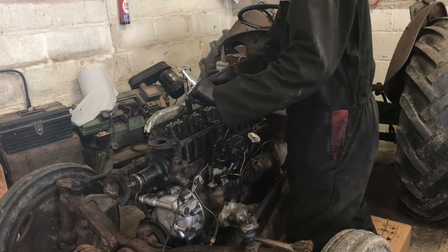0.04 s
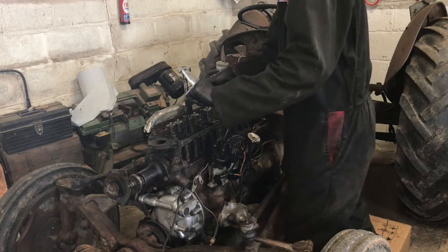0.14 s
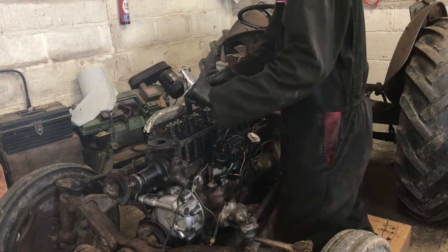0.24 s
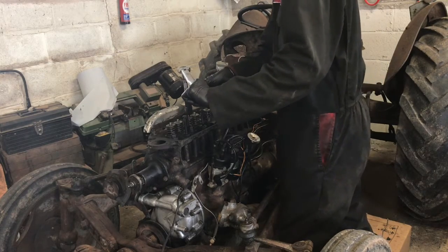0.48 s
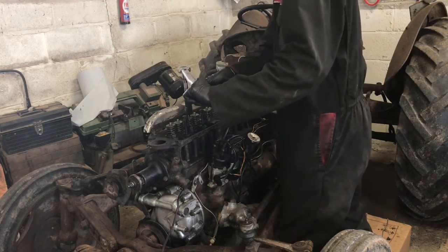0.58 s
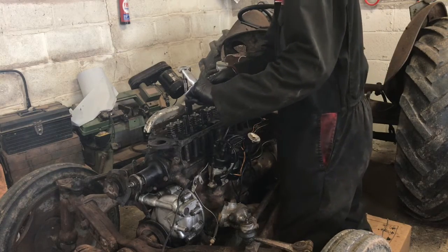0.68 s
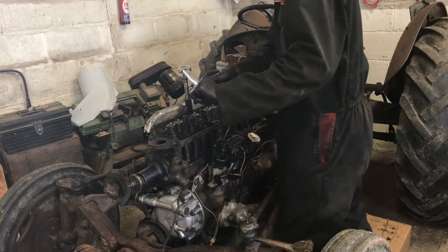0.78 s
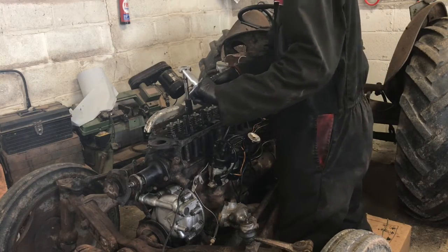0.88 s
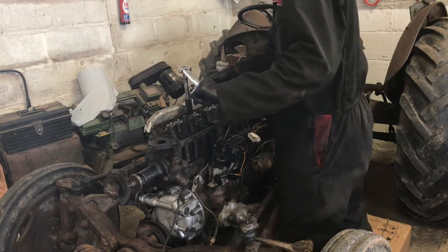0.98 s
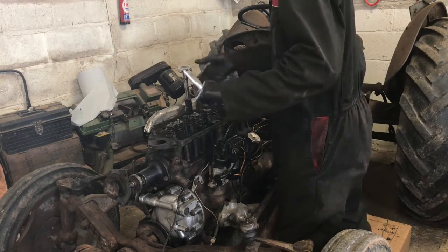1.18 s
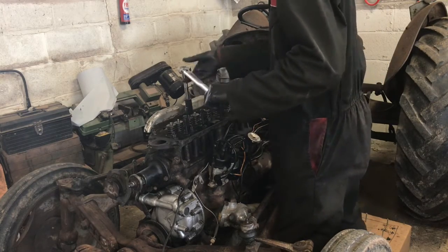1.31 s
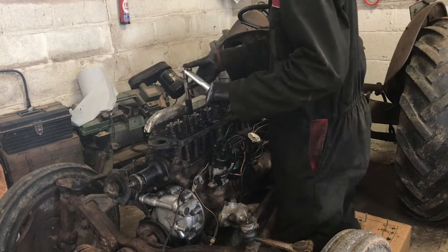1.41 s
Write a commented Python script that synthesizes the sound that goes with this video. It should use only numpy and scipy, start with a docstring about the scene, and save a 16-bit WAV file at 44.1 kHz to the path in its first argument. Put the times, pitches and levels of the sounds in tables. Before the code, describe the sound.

Two loud metallic torque wrench clicks ring through a bare workshop, followed by faint sleeve rustle

```python
"""Torque wrench in a hard-walled workshop

A click-type wrench on an engine creaks under load, breaks over with a bright click, and snaps back
with a duller one as the hand eases off; a sleeve then rustles and the tool is shifted.
Clicks are decaying noise and struck modes, over low-ringing steel and a diffuse room decay.
Rubbing and room air are shaped noise; knocks are noise through a resonance."""
import sys
import numpy as np
from scipy import signal
from scipy.fft import rfft, irfft
from scipy.io import wavfile

SR = 44100
rng = np.random.default_rng(int(sys.argv[2]) if len(sys.argv) > 2 else 0)


def store_pcm(level_fs):
    """Save levels as 16-bit WAV."""
    pcm = np.round(np.clip(level_fs, -1, 1) * 32767).astype(np.int16)
    wavfile.write(sys.argv[1], SR, np.atleast_2d(pcm).T)


N = 63945
TIME = np.arange(N) / SR  # s
FREQS = np.arange(N // 2 + 1) * SR / N  # Hz


def from_db(db):
    """Logarithmic level: 20 dB is a factor of ten in amplitude."""
    return 10 ** (np.asarray(db) / 20)


def at_hz(points, values):
    """Logarithmic pitch scale: values are joined by straight lines over log frequency."""
    log_hz = np.log(np.array(points)[:, 0])
    return np.interp(np.log(FREQS + 1), log_hz, values)


def noise(spectrum, column=0):
    """Spectral density: white noise is filtered to a given level in each hertz of bandwidth."""
    density_db = np.array(spectrum)[:, column + 1]
    gain = from_db(at_hz(spectrum, density_db))
    white = rng.standard_normal(N)
    return irfft(rfft(white) * gain, N) * np.sqrt(SR / 2)


def level(curve):
    """Amplitude envelope: dB points are joined by lines, the end levels held outside them."""
    return from_db(np.interp(TIME, *np.transpose(curve)))


def decay(start, t60, hold=0):
    """Exponential decay: sudden onset, optional hold, then a fall of 60 dB in each t60."""
    elapsed = np.maximum(TIME - start - hold, 0)
    return (TIME >= start) * np.exp(-np.log(1000) * elapsed / t60)


def ring(start, hz, t60):
    """Free vibration: one struck mode is a decaying sine."""
    return decay(start, t60) * np.sin(2 * np.pi * hz * (TIME - start))


BUILD_CYCLES = 2.5  # time constant in cycles, so the bass comes late


def build(start, hz):
    """Resonant build-up: a resonance swells over its first few cycles."""
    elapsed = np.maximum(TIME - start, 0)
    return 1 - np.exp(-elapsed * hz / BUILD_CYCLES)


# quiet of the workshop: (frequency [Hz], density [dB per Hz])
AIR = [(22, -122), (44, -89), (65, -84.5), (110, -92.5), (170, -95.5), (280, -98.5), (500, -104),
       (1000, -109), (2200, -114), (4000, -112), (5500, -118), (10000, -119), (16000, -120)]


def workshop_air():
    """Background noise: a steady random sound with its energy mostly in the bass."""
    return noise(AIR)


# creak of the loaded wrench before break-over: (time [s], level relative to its spectrum [dB])
CREAK_LEVEL = [(.19, -21.5), (.218, 0.5), (.238, -4), (.26, -24)]
# creak spectrum: (frequency [Hz], density before the level [dB per Hz])
CREAK_SPECTRUM = [(150, -94), (700, -93.5), (1600, -99.5), (3000, -104), (8000, -116), (16000, -124)]
# sleeve rubbing as the arm moves: (time [s], level relative to its spectrum [dB])
SLEEVE_LEVEL = [(.95, -9), (1.04, -5), (1.11, 0.5), (1.17, -1), (1.235, -2.5), (1.29, -7), (1.38, -7),
                (1.43, -1.5), (1.45, -4)]
# sleeve spectrum: (frequency [Hz], density before the level [dB per Hz])
SLEEVE_SPECTRUM = [(100, -93.5), (400, -97), (1200, -100), (2500, -106), (5000, -108), (9000, -113),
                   (15000, -112)]
ROUGH_DB, ROUGH_HZ = 0.5, 70  # rms level fluctuation and its upper frequency


def rubbing():
    """Friction noise: creak and sleeve are shaped noise with a slow random unevenness."""
    lowpass = signal.butter(2, ROUGH_HZ, fs=SR, output="sos")
    grain = signal.sosfilt(lowpass, rng.standard_normal(N))
    unevenness = from_db(ROUGH_DB * grain / grain.std())
    creak = noise(CREAK_SPECTRUM) * level(CREAK_LEVEL)
    sleeve = noise(SLEEVE_SPECTRUM) * level(SLEEVE_LEVEL)
    return unevenness * (creak + sleeve)


# the two clicks, break-over then snap-back, shared by cracks, steel and room_tails:
# (time [s], crack level [dB], crack hold [s], crack t60 [s], room tail level [dB]),
# both levels relative to their spectra
CLICKS = [(.2382, -0.5, .004, 0.027, 1.5), (.7099, 1.5, 0.0041, 0.017, -1.5)]
# crack spectrum before its level and the low cut:
# (frequency [Hz], break-over density [dB per Hz], snap-back density [dB per Hz])
CRACK_SPECTRUM = [(250, -92.5, -97), (666, -63.5, -94.5), (1196, -65, -73.5), (1580, -73, -60),
                  (2280, -56, -86.5), (3330, -67, -57), (4850, -61.5, -70.5), (6800, -65, -70.5),
                  (9030, -65, -77), (12500, -66.5, -81), (16000, -66, -80)]
# hard steel-on-steel contacts, before the low cut: (time [s], level [dB], pitch [Hz])
CONTACTS = [(.2387, -17.5, 2440), (0.2398, -15.5, 6990), (.7096, -26, 3370), (0.7103, -22.5, 1750),
            (0.7109, -17, 3220)]
# early reflections of the crack: (delay [s], level relative to the direct sound [dB])
ECHOES = [(.0082, -9.5), (.0112, -10.5)]
CONTACT_T60_S = 0.003
CRACK_LOW_HZ = 350  # the small tool radiates little below this


def cracks():
    """Impact and early reflection: hard contacts in a brief steel rattle, echoed by nearby surfaces."""
    impact = np.zeros(N)
    for k, (start, db, hold, t60, _) in enumerate(CLICKS):
        impact += from_db(db) * noise(CRACK_SPECTRUM, k) * decay(start, t60, hold)
    for start, db, hz in CONTACTS:
        impact += from_db(db) * ring(start, hz, CONTACT_T60_S)
    highpass = signal.butter(2, CRACK_LOW_HZ, "high", fs=SR, output="sos")
    direct = signal.sosfilt(highpass, impact)

    out = direct.copy()
    sample = np.arange(N)
    for delay, db in ECHOES:
        out += from_db(db) * np.interp(sample - round(delay * SR), sample, direct)
    return out


# modes of wrench, socket and engine, levels before the build-up:
# (frequency [Hz], break-over level [dB], snap-back level [dB], t60 [s])
MODES = [(65.7, -70.5, -63.5, 4), (111, -50, -58, 2.1), (119.5, -51.5, -62, 1.8),
         (134.5, -53.5, -59.5, 1.94), (289.7, -61, -56.5, 1.02), (310, -56.5, -57, 1.12),
         (776, -57.5, -50, 0.58), (828, -42, -43, 0.32), (923, -46, -63, 0.2), (981, -39.5, -57.5, .36),
         (1035, -44.5, -62.5, 0.31), (2066, -47.5, -43, 0.51), (2165, -55.5, -37, 0.23),
         (2595, -46.5, -51.5, 0.54), (3285, -39, -40.5, 0.37), (3404, -39, -44.5, .45),
         (3650, -40.5, -51.5, 0.35), (3745, -33, -62, 0.15), (3940, -39.5, -51, 0.4), (4160, -39, -49, .35),
         (4390, -37.5, -38, 0.18), (5190, -45, -53.5, .4), (6030, -74, -66, 1.86), (7005, -36.5, -48, 0.31),
         (7180, -39.5, -49, 0.3), (7340, -36.5, -55.5, 0.3), (7340, -46, -56, 0.5), (10900, -47, -62, 0.37),
         (14048, -39, -57, .23)]


def steel():
    """Modal superposition: both clicks excite the same modes, each with its own strengths."""
    out = np.zeros(N)
    for k, (start, *_) in enumerate(CLICKS):
        for hz, *strengths_db, t60 in MODES:
            onset = start + rng.random() / hz  # scattered by under one cycle
            out += from_db(strengths_db[k]) * ring(onset, hz, t60) * build(start, hz)
    return out


# dense ringing that fills the room, before tail level, decay and build-up:
# (frequency [Hz], break-over density [dB per Hz], snap-back density [dB per Hz])
TAIL_SPECTRUM = [(50, -101.5, -93.5), (95, -55, -65), (181, -70.5, -74), (340, -76.5, -68),
                 (515, -77.5, -80), (803, -72, -68), (955, -64.5, -70.5), (1160, -75, -74),
                 (1605, -74.5, -69.5), (2100, -67, -66.5), (2820, -66.5, -67.5), (3350, -61.5, -65.5),
                 (4700, -69, -71.5), (4840, -73, -78.5), (6440, -70.5, -70.5), (7100, -58.5, -73.5),
                 (7570, -73, -84), (9000, -71.5, -74.5), (10400, -74.5, -85), (14200, -75.5, -83.5),
                 (15500, -72.5, -74.5)]
# workshop reverberation: (frequency [Hz], t60 [s])
ROOM_T60 = [(80, 0.36), (300, 0.65), (600, 0.52), (1200, 0.48), (2600, 0.53), (4500, 0.52), (7000, 0.4),
            (10000, 0.31), (16000, 0.23)]


def room_tails():
    """Diffuse reverberation: noise bands decay at their own rates; bass comes last, treble dies first."""
    out = np.zeros(N)
    bands = np.eye(len(ROOM_T60))  # overlapping triangles that sum to one
    for k, (start, *_, db) in enumerate(CLICKS):
        diffuse = rfft(noise(TAIL_SPECTRUM, k))
        for band, (hz, t60) in zip(bands, ROOM_T60):
            band_noise = irfft(diffuse * at_hz(ROOM_T60, band), N)
            out += from_db(db) * band_noise * decay(start, t60) * build(start, hz)
    return out


# light knocks of the tool in the hand: (time [s], level before the decay [dB], pitch [Hz])
KNOCKS = [(0.604, -63, 7000), (1.109, -66, 1000), (1.230, -62, 6000), (1.334, -69.5, 9140),
          (1.408, -60, 940), (1.427, -61.5, 3870)]
KNOCK_WIDTH = 0.2  # bandwidth as a fraction of the pitch
KNOCK_T60_S = 0.015
KNOCK_ROOM_DB, KNOCK_ROOM_T60_S = -15.5, 0.33  # room level relative to the knock


def knocks():
    """Damped resonance: each small contact is noise through a broad two-pole filter, with a little room."""
    out = np.zeros(N)
    for start, db, hz in KNOCKS:
        radius = np.exp(-np.pi * KNOCK_WIDTH * hz / SR)
        poles = [1, -2 * radius * np.cos(2 * np.pi * hz / SR), radius * radius]
        body = signal.lfilter([1, 0, -1], poles, rng.standard_normal(N))
        room = from_db(KNOCK_ROOM_DB) * decay(start, KNOCK_ROOM_T60_S)
        out += from_db(db) * body / body.std() * (decay(start, KNOCK_T60_S) + room)
    return out


def scene():
    """Linear superposition: the pressures of wrench, handling and room add at one microphone."""
    return (workshop_air() + rubbing() + cracks() + steel() + room_tails() + knocks())[None]


CUTOFF_HZ = 15900


def record(dry):
    """Band limiting: a steep elliptic low-pass removes the top of the spectrum."""
    lowpass = signal.ellip(12, .1, 80, CUTOFF_HZ, fs=SR, output="sos")
    return signal.sosfilt(lowpass, dry)


dry = scene()
out = record(dry)
store_pcm(out)
```